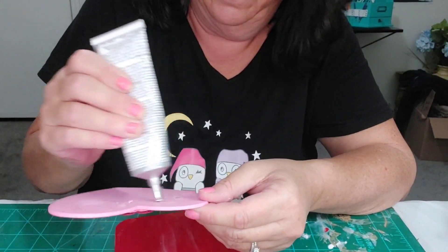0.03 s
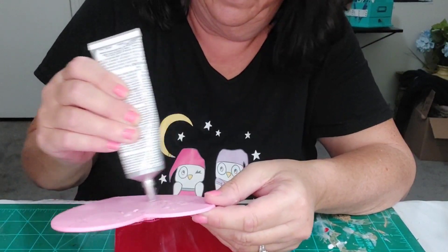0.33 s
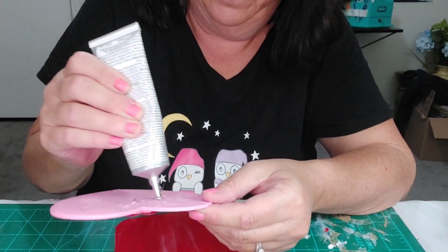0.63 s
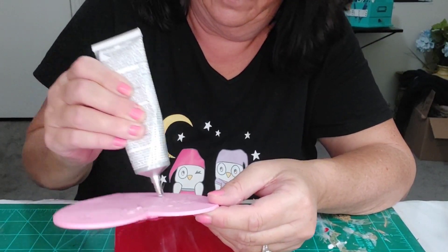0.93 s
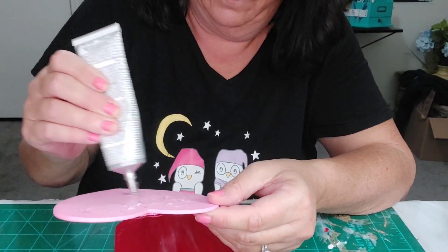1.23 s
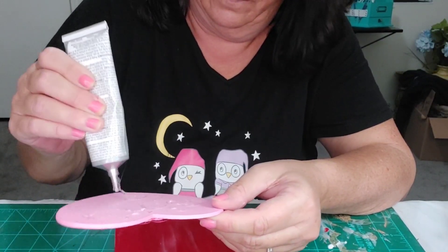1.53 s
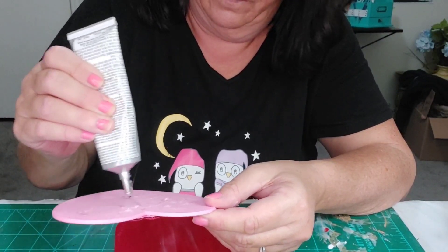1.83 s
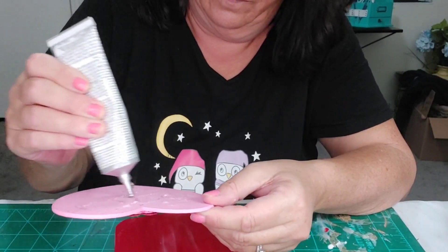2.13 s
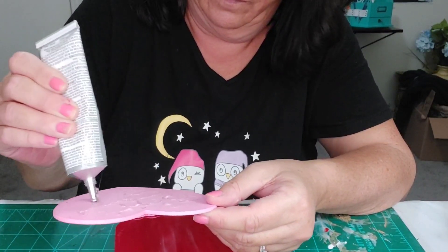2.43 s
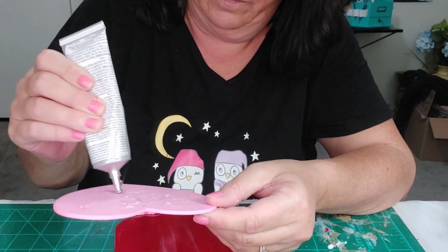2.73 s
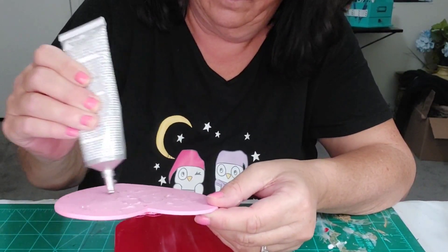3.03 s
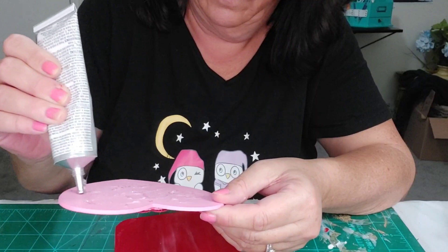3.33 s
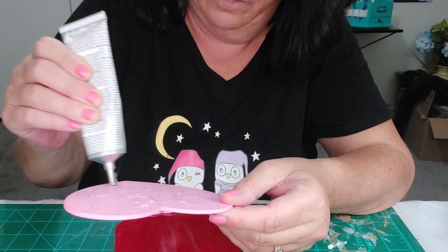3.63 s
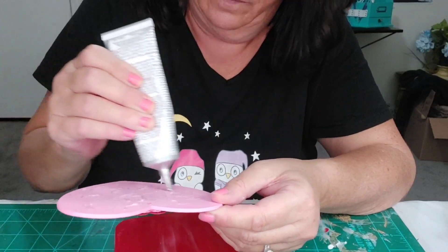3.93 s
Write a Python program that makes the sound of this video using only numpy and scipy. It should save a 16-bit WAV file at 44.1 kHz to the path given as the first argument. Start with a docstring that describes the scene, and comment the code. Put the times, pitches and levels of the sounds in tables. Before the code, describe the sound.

Short scratchy scrapes and light taps of a glue nozzle, over a low room hum.

```python
"""Two light taps close to the microphone, then a glue tube's nozzle scrapes over a hand-held craft piece.
The tip sticks and slips: each slip knocks the flat piece, whose ring depends on where it is touched,
and fine grit hisses on top. More taps fall among the strokes. The place is a small quiet room;
farther back, a low electrical hum beats slowly over faint rumble and hiss."""
import sys
import numpy as np
from scipy import signal
from scipy.fft import rfft, irfft, next_fast_len
from scipy.io import wavfile
from scipy.ndimage import uniform_filter1d, map_coordinates

SR = 44100
rng = np.random.default_rng(int(sys.argv[2]) if len(sys.argv) > 2 else 0)


def transcribe(u):
    """Save the signal u as a 16-bit wav file named by the first command-line argument.

    u: samples, shape (n,) or (channels, n), limited to [-1, 1]; the rate is SR.
    q: integer samples, one column per channel.
    """
    v = np.clip(np.atleast_2d(u).T, -1, 1)
    q = np.round(v * 32767).astype(np.int16)
    wavfile.write(sys.argv[1], SR, q)


N = 176400


def amp(db):
    return 10 ** (np.asarray(db) / 20)


def unit(x):
    return x / np.sqrt(np.mean(x ** 2) + 1e-20)


def along(points, hz):
    """Read (frequency, value) points at hz, on a log axis."""
    f, v = np.transpose(points)
    return np.interp(np.log(hz + 1), np.log(f + 1), v)


def wobble(rate):
    """A smooth random curve, rate knots a second."""
    return map_coordinates(rng.standard_normal(int(N * rate / SR) + 4), [np.arange(N) * rate / SR])


def filtered(x, response):
    """x through a response, given as a function of frequency."""
    n = x.shape[-1]
    padded = next_fast_len(n + 3600, True)
    return irfft(rfft(x, padded) * response(np.fft.rfftfreq(padded, 1 / SR)), padded)[..., :n]


def add(track, s, x):
    """Mix x into the track at time s."""
    i = round(s * SR)
    track[..., i:i + x.shape[-1]] += x[..., :N - i]


def click(spectrum, size=2048):
    """A minimum-phase click of energy 1 with the given spectrum."""
    cepstrum = irfft(np.log(amp(along(spectrum, np.fft.rfftfreq(size, 1 / SR)))))
    cepstrum[1:size // 2] *= 2
    cepstrum[size // 2 + 1:] = 0
    impulse = irfft(np.exp(rfft(cepstrum)))
    return impulse / np.linalg.norm(impulse)


def spread(pair, width):
    """Two unrelated signals as mid and side, turned into left and right."""
    side = filtered(pair[1], lambda hz: amp(along(width, hz)))
    return np.array([pair[0] + side, pair[0] - side])


def pulses(n, per_s, scatter, size_db):
    """n samples of pulses uneven in spacing and size, of about rms 1."""
    gaps, sizes = rng.standard_normal((2, 4000))
    intervals = np.exp(scatter * gaps - scatter ** 2 / 2)
    at = (np.cumsum(intervals) * SR / per_s).astype(int)
    size = unit(amp(size_db * np.clip(sizes, -2, 2)))
    return np.bincount(at[at < n], size[at < n], n) * np.sqrt(SR / per_s)


# Room tone, low and high: (frequency [Hz], relative density [dB])
RUMBLE_SPECTRUM = [(20, -32), (58, -10.5), (100, -5.5), (128, 8), (150, 0), (195, -6.5), (218, 2),
                   (260, -8.5), (310, -8), (390, -22), (1000, -42.5), (3000, -60.5)]
HISS_SPECTRUM = [(300, 7.5), (1500, 2.5), (3000, -4), (7000, -10), (15700, -4)]
# Its width at the microphone: (frequency [Hz], side over mid [dB])
ROOM_TONE_WIDTH = [(130, -18.5), (260, -11), (1000, 0)]
def room_tone(rumble_db=-56.5, hiss_db=-80):
    """Low rumble and faint hiss all around the microphone."""
    def noise(spectrum):
        return unit(filtered(rng.standard_normal((2, N)), lambda hz: amp(along(spectrum, hz))))
    air = amp(rumble_db) * noise(RUMBLE_SPECTRUM) + amp(hiss_db) * noise(HISS_SPECTRUM)
    return spread(air, ROOM_TONE_WIDTH)


# Hum in the background, beating tones and weaker lines: (frequency [Hz], level [dB])
BEATING_TONES = [(120.06, -43.2), (122.59, -56), (117.53, -64)]
WEAK_LINES = [(59.2, -64), (238.6, -71.5)]
def hum(crest_s=.335, waver_db=.35):
    """Electrical tones a few hertz apart crest together and beat, over weaker wavering lines."""
    t = np.arange(N) / SR
    beating = sum(amp(db) * np.cos(2 * np.pi * hz * (t - crest_s)) for hz, db in BEATING_TONES)
    lines = sum(amp(db + 2.3 * wobble(5)) * np.sin(2 * np.pi * hz * t + wobble(4))
                for hz, db in WEAK_LINES)
    return np.sqrt(2) * (beating * amp(waver_db * wobble(4.8)) + lines)


# The small room's decay: (frequency [Hz], time to fall 60 dB [s])
ROOM_DECAY = [(400, 0.32), (1100, 0.23), (12000, 0.2)]
# Width of its reflections: (frequency [Hz], side over mid [dB])
ECHO_WIDTH = [(100, -12.5), (600, -13.5), (1200, 0.5), (2500, 3), (8000, 5)]
def echoes(early_db=-8, early_s=0.02, tail_db=-11):
    """Quick reflections from the table and the body nearby, then the room's short tail."""
    hz, t, noise = signal.stft(rng.standard_normal((2, SR // 4)), SR, nperseg=256)
    decay = amp(-60 * t / along(ROOM_DECAY, hz)[:, None])
    tail = signal.istft(noise * decay, SR, nperseg=256)[1]
    t = np.arange(tail.shape[1]) / SR
    early = rng.standard_normal(tail.shape) * (t / early_s) * np.exp(-2 * np.pi * t / early_s)
    response = sum(amp(db) * h / np.linalg.norm(h[0]) for db, h in [(tail_db, tail), (early_db, early)])
    return spread(response, ECHO_WIDTH)


# Where the work sits before the microphone: (frequency [Hz], left over right [dB])
WORK_BALANCE = [(500, 2.5), (1000, 2.5), (2000, 1.4), (4500, -3), (8000, -2.5), (12500, 4), (15000, 10.5)]
def room(direct, size=20480):
    """Direct sound plus reflections that keep changing as the hands and the tube move."""
    heard = direct.copy()
    fade = np.sin(np.pi * np.arange(size) / size)
    for i in range(0, N - size // 2, size // 2):
        part = direct[:, i:i + size]
        add(heard, i / SR, signal.fftconvolve(part * fade[:part.shape[1]], echoes(), axes=1))
    return filtered(heard, lambda hz: amp(np.outer([.5, -.5], along(WORK_BALANCE, hz))))


def grains(n):
    """Dense tiny catches of the tip on the surface."""
    return pulses(n, per_s=2500, scatter=1, size_db=2) * rng.choice([-1, 1], n)


def rasp(slips, burst_s=0.0022, steady_db=-3.5):
    """Each slip sheds a short burst of grains, over a steadier rub."""
    burst = signal.lfilter([1], [1, -np.exp(-1 / (SR * burst_s))], slips ** 2)
    return unit(grains(len(slips)) * np.sqrt(burst / burst.mean() + amp(steady_db) ** 2))


def hollow(x, echo_s=0.000459, drift=.05, echo_gain=.35):
    """A quick echo across the piece hollows the sound; its path drifts as the tip moves."""
    i = np.arange(N)
    delay = SR * echo_s * (1 + drift * wobble(14))
    echo = np.array([np.interp(i - delay, i, channel) for channel in x])
    return (x + echo_gain * echo) / np.hypot(1, echo_gain)


def patchy(x, depth_db=3):
    """As the tip travels, narrow bands swell and fade by chance for a few hundredths of a second."""
    bands = signal.stft(x)[2]
    patches = uniform_filter1d(rng.standard_normal(bands.shape[1:]), size=5, axis=0)
    patches = uniform_filter1d(patches, size=12, axis=1)
    return signal.istft(bands * unit(amp(depth_db * unit(patches))))[1][:, :N]


# One grain of grit, heard close: (frequency [Hz], relative density [dB])
GRIT_SPECTRUM = [(1500, -38.5), (2800, -10), (3700, 1), (5300, 5.5), (6500, -2), (8600, -1.5),
                 (10000, -4.5), (11500, -2.5), (13000, 1.5), (15700, -5.5)]
def grit(catches):
    """Every tiny catch at the tip is a bright click; together they hiss."""
    return signal.fftconvolve(patchy(hollow(catches)), click(GRIT_SPECTRUM)[None], axes=1)[:, :N]


# Places the nozzle touches: inner, middle, lobe, edge, corner, rim, tip
TOUCH_PLACES = ["inner", "middle", "lobe", "edge", "corner", "rim", "tip"]
# Modes of the piece: (frequency [Hz], bandwidth [Hz], then relative level [dB] at each place)
PIECE_MODES = [(484, 170, -16, -10, -12.5, -5.5, 1.5, -16.5, -20),
               (601.2, 27, -0.5, -3, -10, 4.5, 11, 6, 4), (709.4, 78.4, 1, -0.5, 3.5, -4, -13, 0.5, 0.5),
               (941, 108, -4, -2.5, 1, -5, -24, -3.5, 1), (1115, 152, -5, -7.5, 3.5, -5, -9, -5.5, -1.5),
               (1299, 100, 1.5, -5, -9, 0.5, 2.5, -7.5, -3.5),
               (1476, 140, 1, -1.5, -6.5, 0.5, -4.5, -16, -17),
               (1677, 188, -1.5, -2.5, -3, 0.5, -2.5, -15.5, -25),
               (1922, 192, -7, -7, -6.5, -5, -7.5, -27.5, -27.5),
               (2297, 180, -8.5, -6.5, -16.5, -7.5, -5, -9, -13.5),
               (2608, 156, -7, -6.5, -10.5, -11.5, -7.5, -13.5, -22),
               (3090, 330, -17.5, -11.5, -21.5, -12.5, -13.5, -20, -21),
               (3780, 320, -17, -12.5, -16, -12, -18, -20, -23),
               (4724, 205, -35, -34, -22.5, -10.5, -23, -38, -28)]
def piece(force, drift_db=2, drifts_per_s=14, low_hz=188, high_hz=5650):
    """Each mode rings as strongly as the touched place excites it, and drifts as the tip travels."""
    centres, widths, *levels = np.transpose(PIECE_MODES)
    gains = amp(levels)
    gains /= np.sqrt(gains ** 2 @ (np.pi * widths / SR))[:, None]  # equal energy at every place
    drives = gains.T @ np.array([force[place] for place in TOUCH_PLACES])
    ring = np.zeros(N)
    for k, (hz, width, drive) in enumerate(zip(centres, widths, drives)):
        drifting = drive * amp(drift_db * wobble(drifts_per_s))
        mode = filtered(drifting, lambda f: 1j * f * width / (hz * hz - f * f + 1j * f * width))
        ring += (-1) ** k * mode

    def band(f):
        highpass = (1j * f / (low_hz + 1j * f)) ** 2
        return highpass / (1 - (f / high_hz) ** 2 + 1j * f / high_hz)
    return filtered(ring, band)


# Taps near the microphone: (time [s], level [dB], grit over knock [dB], place)
NOZZLE_TAPS = [(.107, -25, -15, "tip"), (.117, -22.5, -13.5, "lobe"), (0.281, -36, -19, "inner"),
               (2.01, -29, -20, "rim"), (2.03, -32, -25.5, "inner"), (2.05, -32, -17, "rim"),
               (2.298, -28.5, 4, "inner"), (2.357, -20.5, -13, "rim"), (3.95, -31, -28, "inner")]
def taps(force, catches, scuff_s=0.022, scuff_db=-2, dull_hz=6000):
    """Add each tap to force and catches: one knock and a quickly dying scuff."""
    n = SR // 2
    t = np.arange(n) / SR
    for time, db, grit_db, place in NOZZLE_TAPS:
        scuff = grains(n) * np.exp(-t / scuff_s)
        blow = amp(db) * (signal.unit_impulse(n) + amp(scuff_db) * scuff / np.linalg.norm(scuff))
        add(force[place], time, blow)
        add(catches, time, amp(grit_db) * filtered(blow, lambda f: 1 / (1 + 1j * f / dull_hz)))


# Strokes near the microphone: (start [s], stop [s], crest [s], swell half-width [s], held level [dB],
# swell [dB], grit over scrape [dB], extra grit at crest [dB], slip rate [1/s], landing,
# first place, last place)
NOZZLE_STROKES = [(0.284, 0.472, .402, 0.064, -50, 17, -21, 5.5, 190, "hard", "inner", "inner"),
                  (.455, 0.544, .525, .03, -45, 0.5, -21.5, 3.5, 115, "soft", "inner", "inner"),
                  (.659, 0.802, .794, 0.099, -55.5, 15.5, -13, -9, 114, "hard", "inner", "inner"),
                  (0.928, 1.015, .974, 0.034, -49.5, 8.5, -15, 4, 260, "hard", "middle", "middle"),
                  (.995, 1.102, 1.058, 0.029, -45.5, 2.5, -15.5, -1.5, 230, "soft", "lobe", "lobe"),
                  (1.069, 1.196, 1.155, 0.05, -47.5, 3.5, -14.5, 2.5, 240, "soft", "edge", "edge"),
                  (1.342, 1.431, 1.385, 0.031, -56.5, 4, -16.5, 2.5, 260, "hard", "edge", "edge"),
                  (1.403, 1.515, 1.46, .05, -55, 4.5, -13.5, 3.5, 240, "soft", "corner", "corner"),
                  (2.247, 2.322, 2.284, 0.025, -55.5, 11.5, -21.5, 3, 170, "soft", "inner", "inner"),
                  (2.328, 2.456, 2.36, 0.027, -60, 9, -18.5, -6.5, 150, "hard", "rim", "rim"),
                  (2.434, 2.588, 2.51, 0.082, -58, 9, -10, -4.5, 120, "soft", "rim", "rim"),
                  (2.559, 2.634, 2.575, 0.017, -62, 3, -10.5, 1, 80, "soft", "rim", "corner"),
                  (2.843, 2.892, 2.865, .026, -67.5, 5.5, -18.5, 0.5, 170, "hard", "rim", "rim"),
                  (2.921, 2.985, 2.965, .016, -70, 8, -14.5, 0, 150, "soft", "rim", "rim"),
                  (3.267, 3.364, 3.337, 0.061, -70.5, 13.5, -11.5, -1.5, 220, "soft", "tip", "tip"),
                  (3.383, 3.449, 3.43, 0.029, -68, 6.5, -18, -9, 160, "soft", "tip", "tip"),
                  (3.58, 3.742, 3.665, 0.066, -62, 7, -13.5, 1, 230, "hard", "edge", "edge")]
def strokes(force, catches, release_s=0.014, rub_db=1.5, side_db=-1.5):
    """Add each stroke to force and catches: the tip bites, sticks and slips under one push, lets go."""
    bite_s = {"hard": .003, "soft": .03}
    n = SR // 2
    t = np.arange(n) / SR
    for (start, stop, crest, width, held_db, swell_db, grit_db, crest_grit_db,
         slip_rate, landing, first, last) in NOZZLE_STROKES:
        push = np.exp(-((start + t - crest) / width) ** 2)
        bite = np.minimum(t / bite_s[landing], 1)
        release = np.exp(-np.maximum(start + t - stop, 0) / release_s)
        level = bite * release * amp(held_db + swell_db * push)
        slips = pulses(n, slip_rate, scatter=.24, size_db=2.5)
        rub = rasp(slips)
        scrape = level * (slips + amp(rub_db) * rub) / np.hypot(1, amp(rub_db))
        travel = np.minimum(t / (stop - start), 1)
        add(force[first], start, (1 - travel) * scrape)
        add(force[last], start, travel * scrape)
        wide_rub = rub + amp(side_db) * np.outer([1, -1], rasp(slips))
        add(catches, start, level * amp(grit_db + crest_grit_db * push) * wide_rub)


def nozzle():
    """Strokes and taps make the piece ring; their tiny catches make the grit."""
    force = {place: np.zeros(N) for place in TOUCH_PLACES}
    catches = np.zeros((2, N))
    strokes(force, catches)
    taps(force, catches)
    return piece(force) + grit(catches)


def scene(left_db=1.84):
    """The work close to the microphone; hum and room tone behind it, slightly to the left."""
    lean_left = amp(left_db * np.array([[.5], [-.5]]))
    return room(nozzle()) + (hum() + room_tone()) * lean_left


def record(dry, top_hz=15800):
    """The stereo microphone's recorder keeps nothing above its band limit."""
    return filtered(dry, lambda hz: hz < top_hz)


dry = scene()
out = record(dry)
transcribe(out)
```